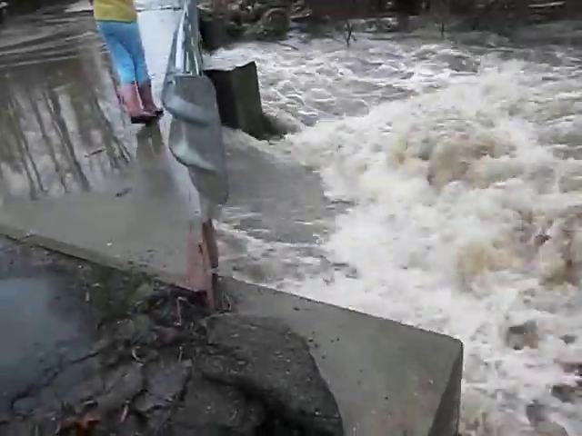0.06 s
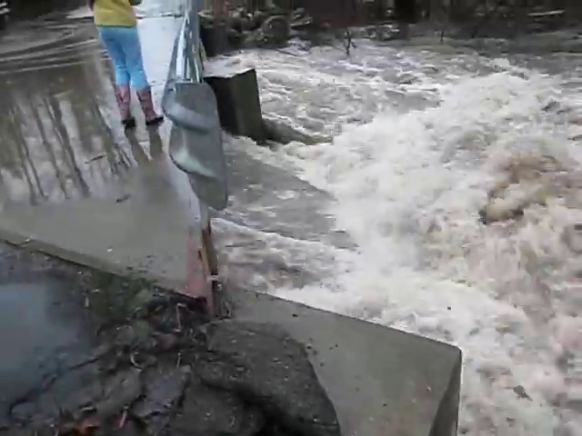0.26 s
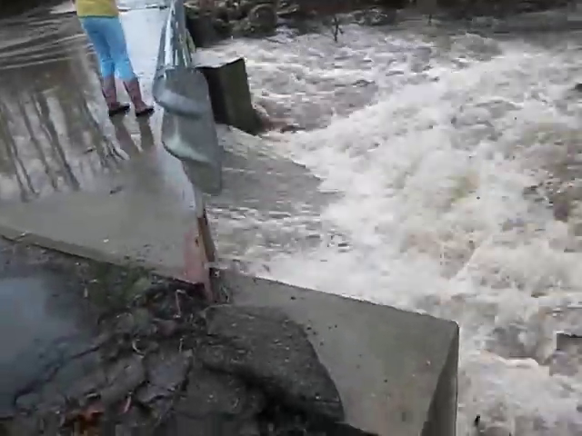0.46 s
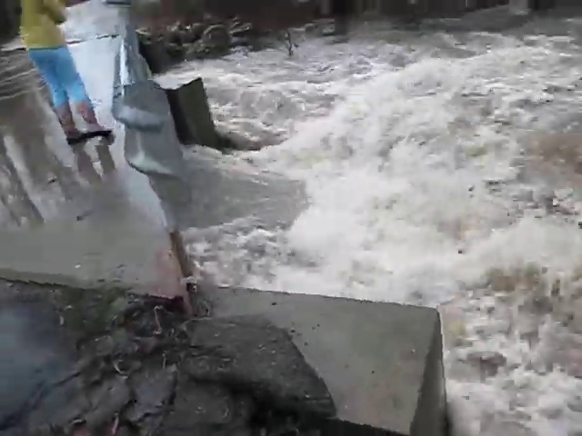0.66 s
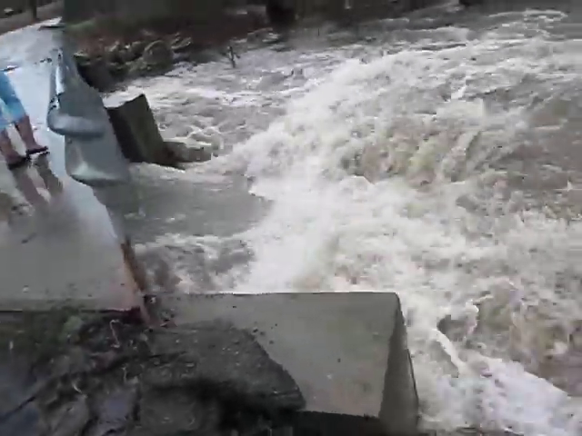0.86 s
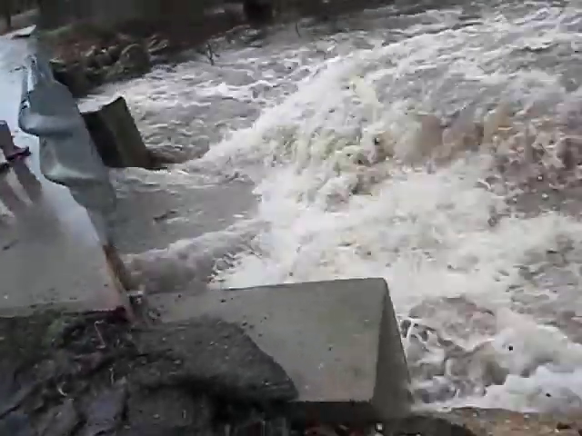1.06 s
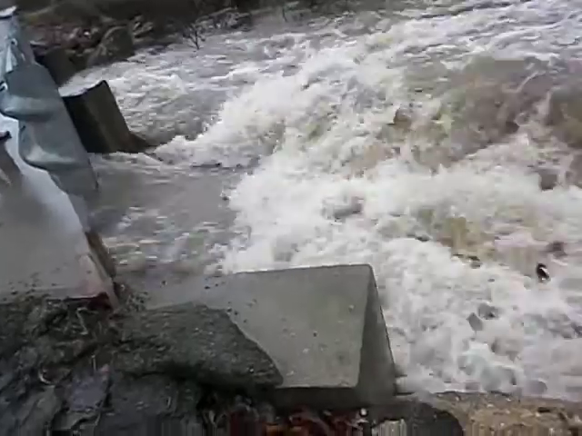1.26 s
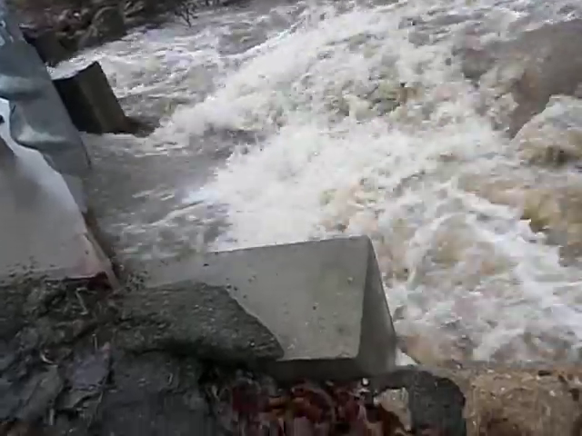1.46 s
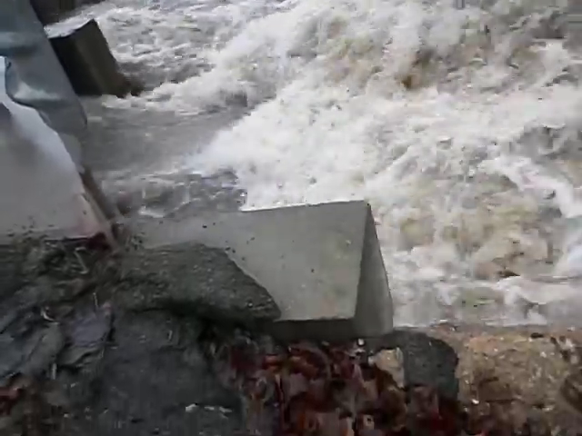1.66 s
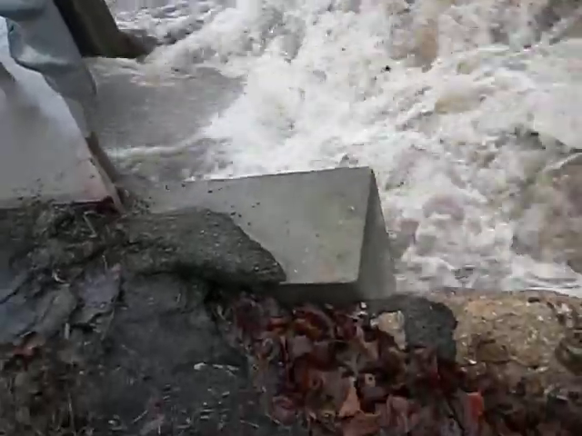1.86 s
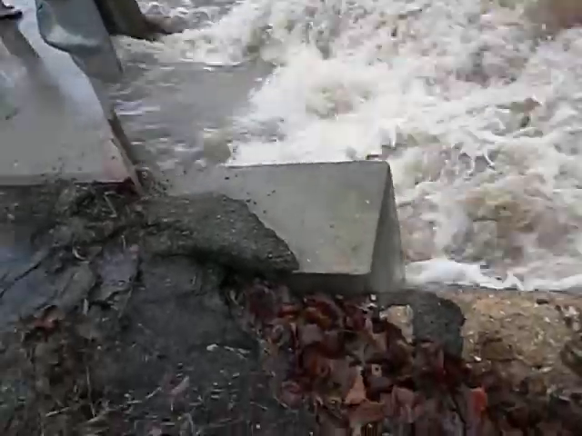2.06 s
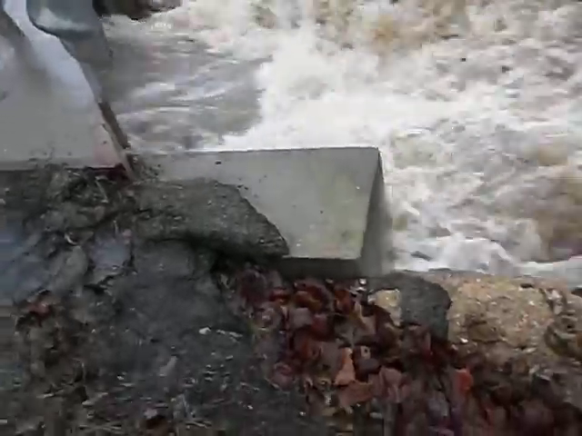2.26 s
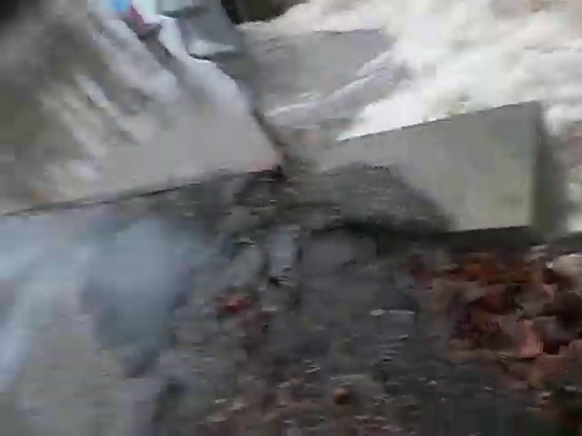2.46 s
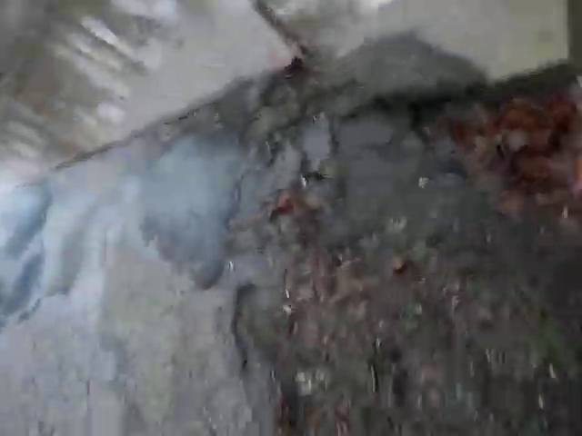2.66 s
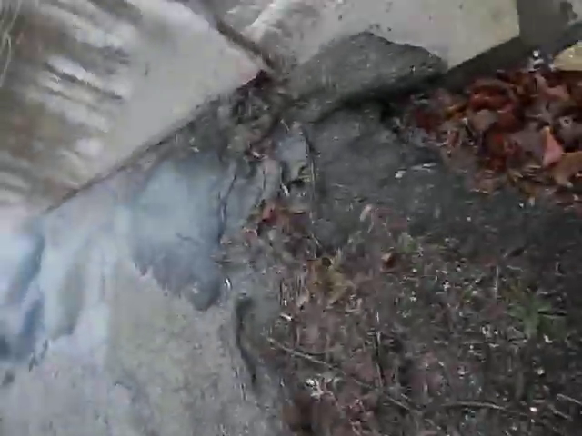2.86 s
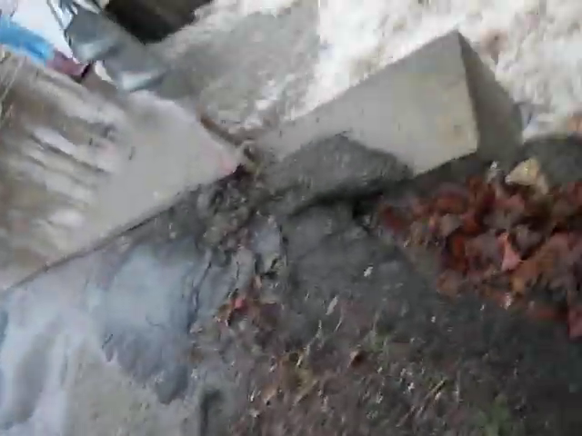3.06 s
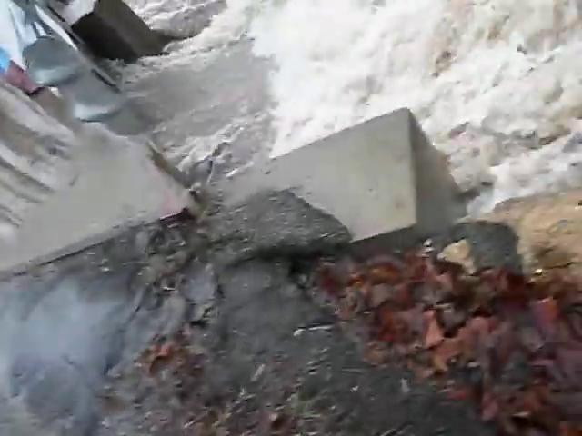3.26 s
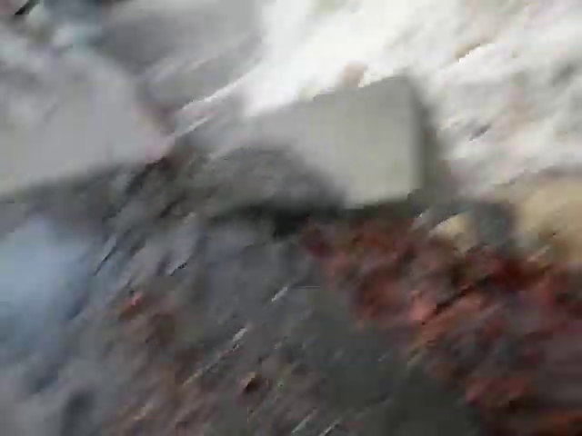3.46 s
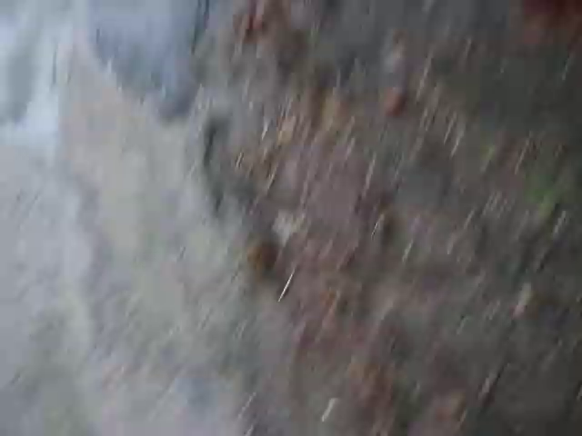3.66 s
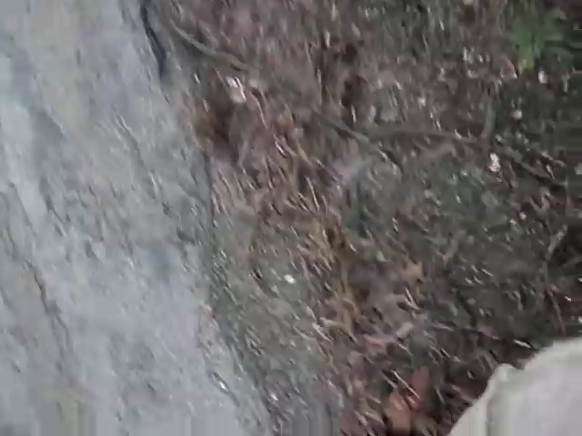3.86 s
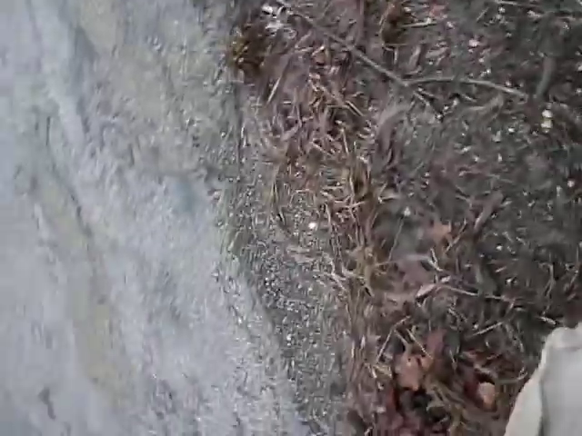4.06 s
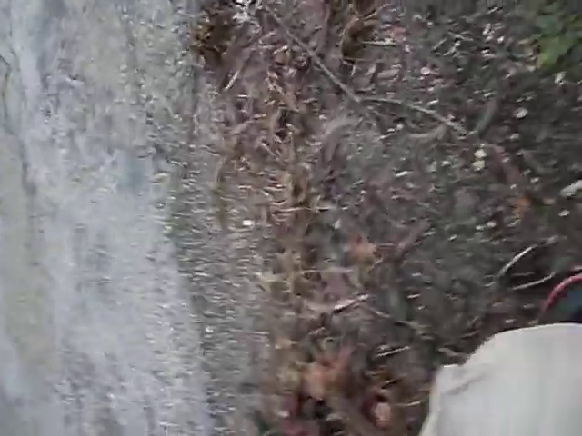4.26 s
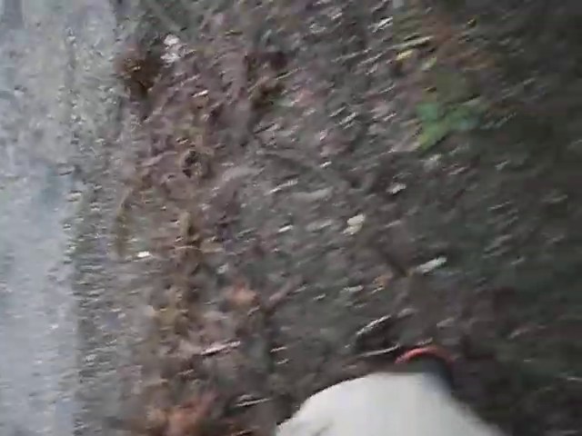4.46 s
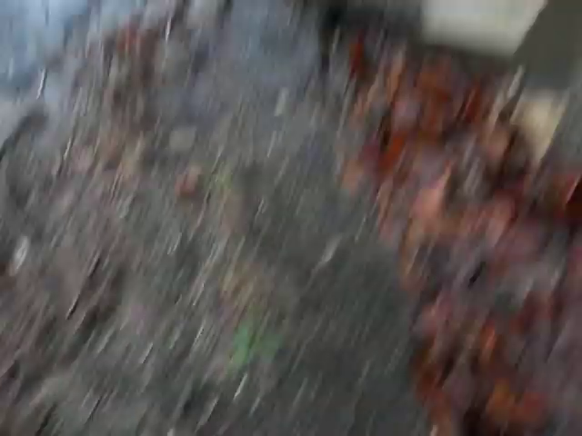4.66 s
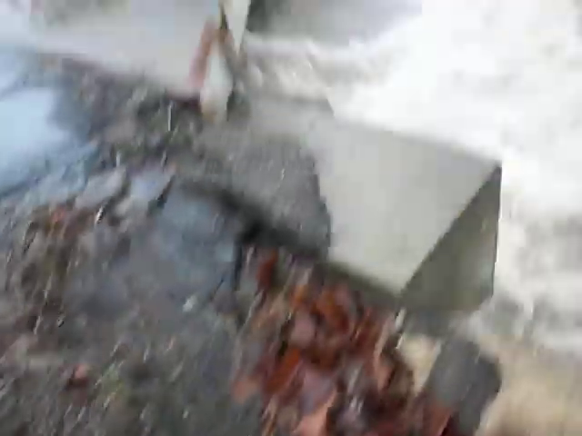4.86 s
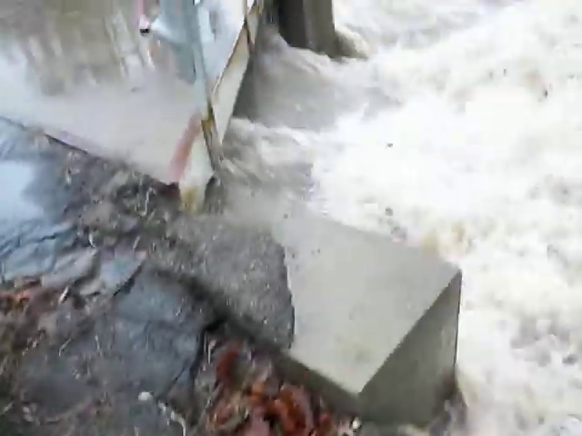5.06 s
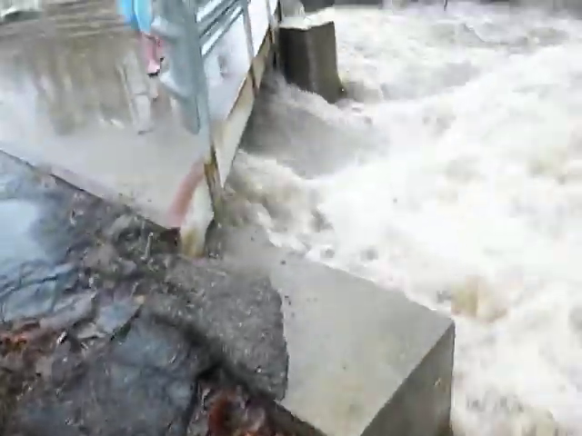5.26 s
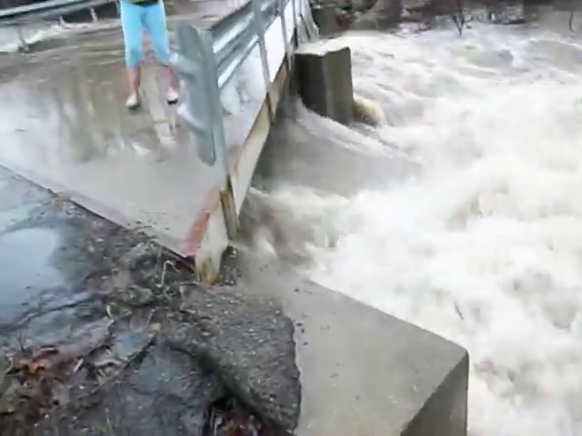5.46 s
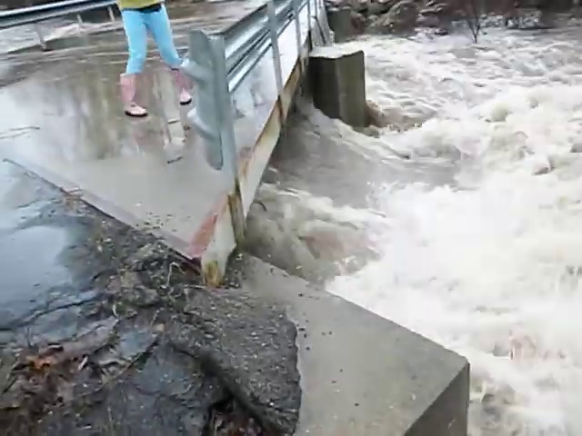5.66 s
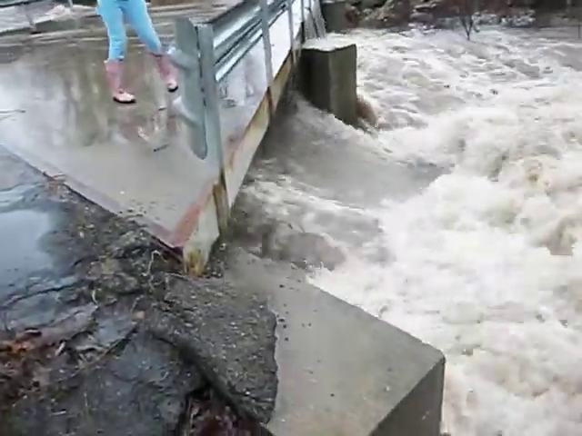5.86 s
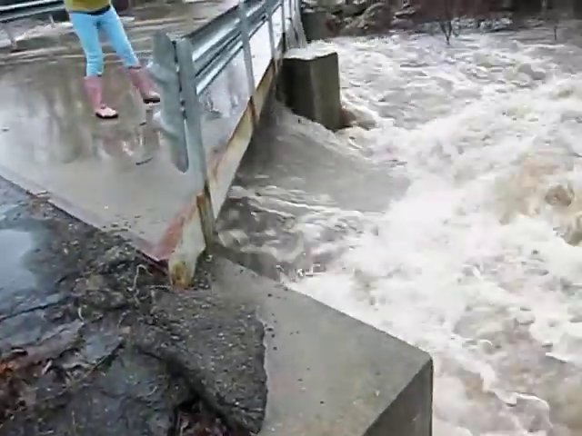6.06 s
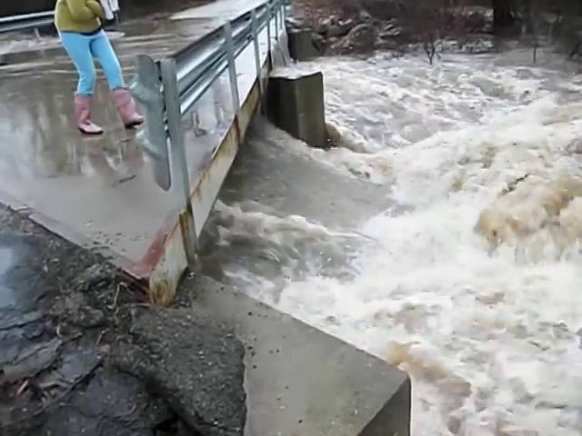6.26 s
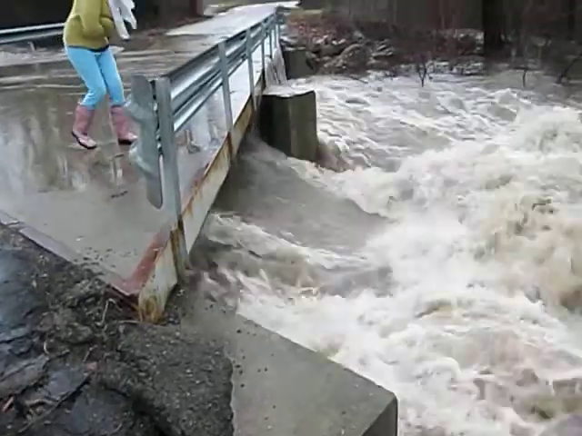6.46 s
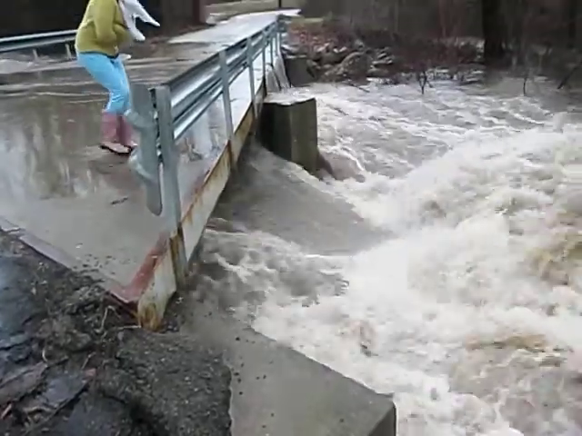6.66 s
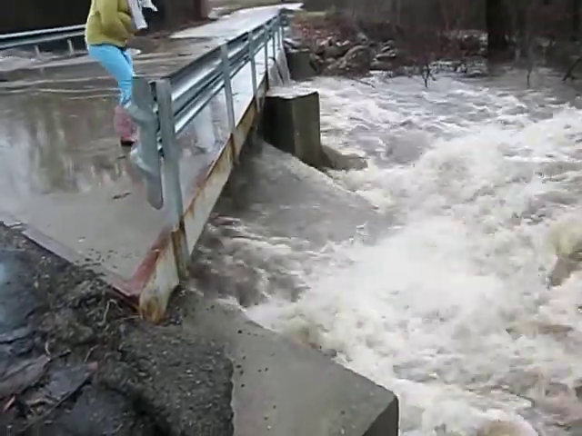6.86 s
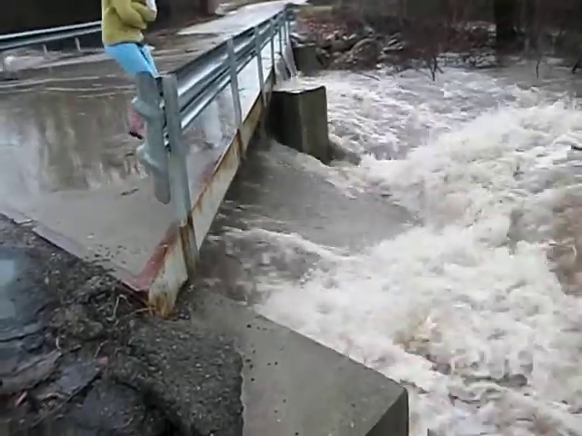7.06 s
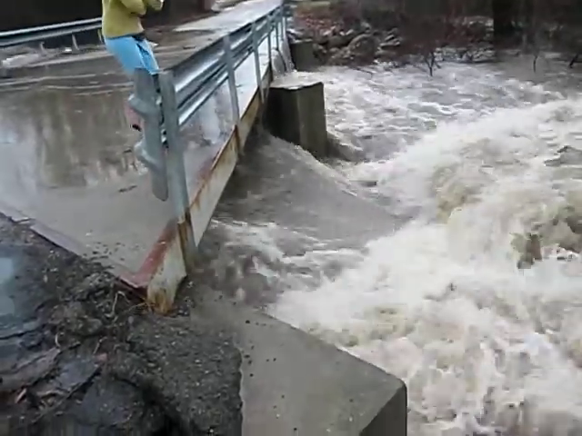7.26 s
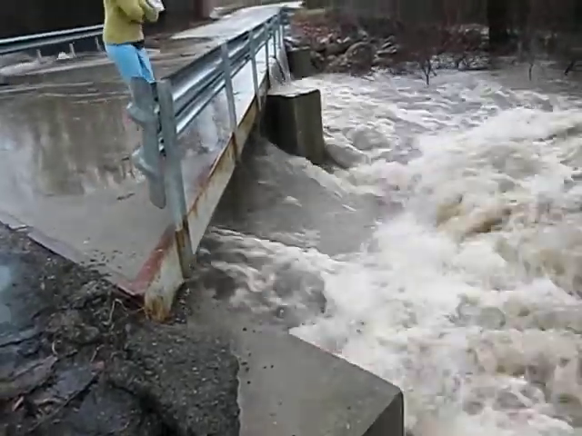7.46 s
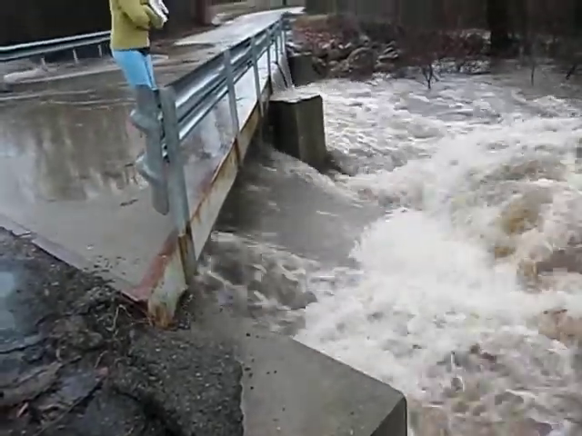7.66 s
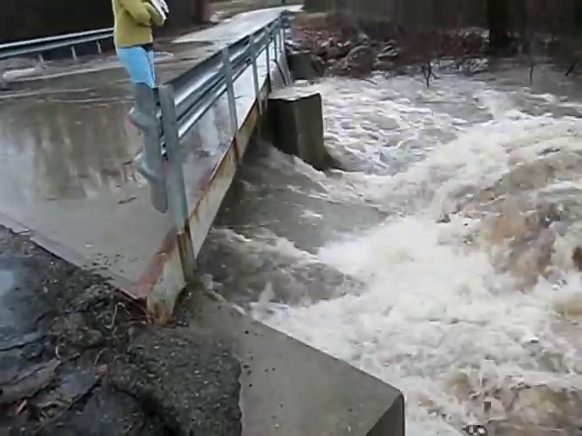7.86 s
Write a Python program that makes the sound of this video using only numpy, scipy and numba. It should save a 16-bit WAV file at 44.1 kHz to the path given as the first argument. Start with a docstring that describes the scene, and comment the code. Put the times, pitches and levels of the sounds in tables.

```python
"""The roar of a flooded creek, heard from the bank as it pours out under a low concrete bridge.
Countless bubbles in the white water merge into a wash that hardly changes, with nearer ones ringing in it.
Wind rumbles, thumps and snaps right on the microphone of a small hand-held camera; its shell ticks once.
At each hard buffet the camera's gain control ducks the water, which then swells back."""
import sys
import numpy as np
from scipy import signal
from scipy.fft import rfft, irfft, next_fast_len
from scipy.io import wavfile
from scipy.ndimage import uniform_filter1d
from numba import njit

SR = 44100
rng = np.random.default_rng(int(sys.argv[2]) if len(sys.argv) > 2 else 0)


def master_out(mix):
    """Clip the mix to full scale and print it as 16-bit PCM to the path in sys.argv[1]."""
    frames = np.transpose(np.atleast_2d(mix))
    ceiling = np.clip(frames, -1, 1)
    pcm = np.round(ceiling * 32767).astype(np.int16)
    wavfile.write(sys.argv[1], SR, pcm)


N = 349272
TIME = np.arange(N) / SR

# Colour of the large eddies at the microphone: frequency_hz, density_db
RUMBLE_SPECTRUM = [(8, 2), (25, 2), (60, -2.5), (130, -4.5), (250, -11), (500, -19.5), (1200, -52),
                   (4000, -87)]
# Colour of the small eddies at the microphone: frequency_hz, density_db
FLUTTER_SPECTRUM = [(60, -27.5), (200, -14), (350, 6.5), (800, -2.5), (1500, -13), (3000, -22),
                    (5000, -51.5), (9000, -77)]
# Gusts reaching the bank, with relative levels while they hold: start_s, hold_s, rumble_db, flutter_db
WIND_GUSTS = [(1.1, 0.043, -9, -30), (1.983, 0.33, -16, -20.5), (2.443, 0.28, -6.5, -19),
              (2.933, 0.11, 2.5, -12.5), (3.782, 0.38, -3, -10.5), (4.064, 0.46, 6, -1.5),
              (5.078, 0.16, -13, -26.5), (5.933, 0.67, -17, -22), (7.205, 0.062, -10.5, -17)]
# The hardest buffets on the microphone, weak above their corner: time_s, peak_db, length_s, corner_hz
MIC_BUFFETS = [(1.153, 2, 0.0071, 170), (1.68, -1, 0.004, 70), (1.895, -4.5, 0.0046, 70),
               (2.023, 2, 0.014, 287), (2.262, 10, 0.0066, 208), (2.437, 10.5, 0.01, 110),
               (2.487, 4, .005, 330), (2.512, 9.5, 0.007, 286), (2.678, 9.5, .007, 260),
               (2.724, 6.5, .007, 307), (2.76, 10.5, 0.0076, 300), (2.894, 7, 0.012, 275),
               (2.944, 15.5, 0.0056, 190), (2.981, 12, 0.014, 60), (3.052, 13, 0.029, 54.3),
               (3.77, 8.5, 0.033, 250), (3.856, 14.5, 0.0055, 297), (3.953, 15, 0.0067, 290),
               (4.023, 15.5, 0.0039, 330), (4.102, 21.5, 0.0063, 420), (4.121, 20, .025, 450),
               (4.154, 23, .01, 280), (4.193, 13, .003, 550), (4.288, 20.5, 0.0069, 170),
               (4.336, 17, 0.0042, 350), (4.468, 18, 0.022, 350), (4.496, 12.5, 0.0023, 560),
               (4.598, 12, 0.021, 168), (4.725, 2, 0.015, 220), (4.926, 1, 0.0052, 170),
               (5.265, 5, 0.0063, 319), (5.676, 5.5, 0.0043, 223), (5.877, 6, 0.0075, 238),
               (5.993, 2.5, 0.014, 74), (6.326, -2.5, 0.021, 85), (6.387, 1, 0.018, 205),
               (6.624, 2, .006, 160), (6.911, -3, 0.015, 165), (7.177, 2, 0.011, 280),
               (7.181, 5, 0.013, 91), (7.9, 2, .005, 220)]
# A sharp tick on the camera body: start_s, peak_db
SHELL_TICKS = [(2.461, 9)]
# Colour of the white water from the bank: frequency_hz, density_db
WATER_SPECTRUM = [(30, -13), (220, 0), (315, -8), (430, -0.5), (950, -2), (1300, -6.5), (1900, -7),
                  (2300, -9), (3300, -9), (4700, -10.5), (6100, -4), (7300, -10), (7900, -22), (8500, -30)]
# Slow rise and fall of the water's loudness at the microphone, partly as the camera turns:
# time_s, offset_db
WATER_LOUDNESS = [(0, 0), (1.1, 2), (1.85, 0.5), (2.15, -4), (2.55, 0), (3.4, -1), (4.25, 2), (4.75, 0),
                  (4.98, 5), (5.3, -4), (5.7, -1), (6.3, -0.5), (6.7, 0.5), (7.9, -1)]


def gain_of(db):
    """Decibels to amplitude."""
    return 10 ** (np.asarray(db) / 20)


def unit_rms(x):
    """Scales to an rms of one."""
    return x / np.sqrt(np.mean(x ** 2) + 1e-20)


def add_centred(mix, time_s, sound):
    """Mixes in a sound centred on time_s."""
    start = max(round(time_s * SR) - len(sound) // 2, 0)
    part = mix[start:start + len(sound)]
    part += sound[:len(part)]


def coloured(x, spectrum):
    """Filters a signal by a spectrum drawn on a log-frequency axis; the result has an rms of one."""
    size = next_fast_len(N)
    hz = np.fft.rfftfreq(size, 1 / SR)
    frequency_hz, density_db = np.transpose(spectrum)
    shape_db = np.interp(np.log(hz + 1), np.log(frequency_hz + 1), density_db)
    return unit_rms(irfft(rfft(x, size) * gain_of(shape_db), size)[:N])


def wander(rate_hz):
    """A smooth random drift with an rms of one, changing up to about rate_hz times a second."""
    size = next_fast_len(N)
    smoothing = np.exp(-(np.fft.rfftfreq(size, 1 / SR) / rate_hz) ** 2)
    return unit_rms(irfft(rfft(rng.standard_normal(size)) * smoothing, size)[:N])


def random_moments(count):
    """Moments spread through the scene, each with two draws from -1 to 1: (sample, draw, draw)."""
    place, first, second = rng.random((count, 3)).T
    samples = ((np.arange(count) + place) * N / count).astype(int)
    return zip(samples, 2 * first - 1, 2 * second - 1)


def shell_ticks(band_hz, decay_s, size=1024):
    """A dry click of a millisecond or two on the camera's shell, right by the microphone."""
    out = np.zeros(N)
    t = (np.arange(size) - size // 2) / SR
    envelope = (t >= 0) * np.exp(-abs(t) / decay_s)
    band = signal.butter(4, band_hz, "band", fs=SR, output="sos")
    for start_s, peak_db in SHELL_TICKS:
        click = signal.sosfilt(band, rng.standard_normal(size) * envelope)
        add_centred(out, start_s, gain_of(peak_db) * click / abs(click).max())
    return out


def gust_levels(breeze_rumble_db, breeze_flutter_db, rise_db_per_s, fall_db_per_s):
    """Rumble and flutter levels in dB: each gust rises out of the breeze, holds and dies away."""
    rumble_db, flutter_db = np.full(N, breeze_rumble_db), np.full(N, breeze_flutter_db)
    for start_s, hold_s, held_rumble_db, held_flutter_db in WIND_GUSTS:
        before_s, after_s = np.maximum(start_s - TIME, 0), np.maximum(TIME - start_s - hold_s, 0)
        below_db = rise_db_per_s * before_s + fall_db_per_s * after_s
        rumble_db = np.maximum(rumble_db, held_rumble_db - below_db)
        flutter_db = np.maximum(flutter_db, held_flutter_db - below_db)
    return rumble_db, flutter_db


def turbulence(rumble_db, flutter_db, lumpy_db, ragged_db):
    """Wind at the microphone port: large eddies rumble, small ones flutter in ragged clumps."""
    eddies = wander(rate_hz=35)
    lumps = unit_rms(gain_of(lumpy_db * np.tanh(eddies)))
    clumps = unit_rms(gain_of(ragged_db * np.tanh((eddies + wander(rate_hz=110)) / 2)))
    rumble = coloured(rng.standard_normal(N), RUMBLE_SPECTRUM) * lumps
    flutter = coloured(rng.standard_normal(N), FLUTTER_SPECTRUM) * clumps
    return gain_of(rumble_db) * rumble + gain_of(flutter_db) * flutter


def eddy(length_s, low_hz, knee_hz, top_hz, size=4096):
    """A whirl of pressure with a peak of one: flat from low to knee, then sloping, steeply above top."""
    t, hz = (np.arange(size) - size // 2) / SR, np.fft.rfftfreq(size, 1 / SR)
    low_cut = hz / np.hypot(hz, low_hz)
    roll_off = 1 / np.hypot(1, hz / knee_hz) / np.hypot(1, (hz / top_hz) ** 2)
    friction = np.exp(-(hz / 5000) ** 4)  # the smallest eddies die out
    burst = rng.standard_normal(size) / np.cosh(2 * t / length_s)
    whirl = irfft(rfft(burst) * low_cut * roll_off * friction)
    return whirl / abs(whirl).max()


def snap(peak_db):
    """The flow tears off the edge of the microphone port in a dry pop; harder ones are brighter."""
    brighter_octaves = 0.054 * peak_db
    return gain_of(peak_db) * eddy(0.0025, low_hz=288, knee_hz=820, top_hz=1080 * 2 ** brighter_octaves)


def crackle(level_db, spread_db, count=520):
    """Random snaps ride on the flutter and stand clear of the water only in strong gusts."""
    out = np.zeros(N)
    for at, strength, _ in random_moments(count):
        add_centred(out, at / SR, snap(level_db[at] + spread_db * strength))
    return out


def bumps(level_db, spread_db, length_s, low_hz, corner_hz, count=40):
    """Lesser eddies bump the microphone at random, harder in the gusts."""
    out = np.zeros(N)
    for at, strength, speed in random_moments(count):
        knee_hz = corner_hz * 2 ** (speed / 2)
        bump = eddy(length_s, low_hz, knee_hz, top_hz=2 * knee_hz)
        add_centred(out, at / SR, gain_of(level_db[at] + spread_db * strength) * bump)
    return out


def buffets(snap_db, snap_at_hz, snap_db_per_octave):
    """Each large eddy thumps the microphone; faster, smaller ones reach higher and snap louder."""
    out = np.zeros(N)
    for time_s, peak_db, length_s, corner_hz in MIC_BUFFETS:
        thump = eddy(length_s, low_hz=4.8, knee_hz=corner_hz, top_hz=1.76 * corner_hz)
        add_centred(out, time_s, gain_of(peak_db) * thump)
        speed_db = snap_db_per_octave * np.log2(corner_hz / snap_at_hz)
        add_centred(out, time_s, snap(peak_db + snap_db + speed_db))
    return out


def near_bubbles(per_s, spread_db, cycles, pitches=16):
    """Bubbles nearer the bank ring for a few cycles each, rising in pitch as they reach the surface."""
    out = np.zeros(N)
    for pitch_hz in np.geomspace(350, 7000, pitches):
        age = np.arange(1500) / SR * pitch_hz / cycles  # in ring lengths
        rise = 1 + 0.066 * np.minimum(age, 2)
        ring = np.exp(-2 * age) * np.sin(2 * np.pi * cycles * age * rise)
        born = rng.random(N) < per_s / pitches / SR
        births = np.zeros(N)
        births[born] = gain_of(spread_db * np.minimum(rng.standard_exponential(N)[born], 4))
        out += signal.oaconvolve(births, ring / np.linalg.norm(ring))[:N] * np.sqrt(pitch_hz)
    return unit_rms(out)


def foam(patchy_db, flicker_db, spray_db, size=512, hop=128):
    """Countless bubbles merge into a roar; collapsing crests lift patches of it, and spray its treble."""
    hz, frames = np.fft.rfftfreq(size, 1 / SR), N // hop + 6
    real, imag, patches = rng.standard_normal((3, len(hz), frames))
    patches = uniform_filter1d(patches, size=16, axis=1)  # smooth in time
    patches = unit_rms(uniform_filter1d(patches, size=8, axis=0))  # and in frequency
    spray = unit_rms(uniform_filter1d(rng.standard_normal(frames), size=14))
    treble = np.minimum(hz / 6000, 1)[:, None]
    spectra = (real + 1j * imag) * gain_of(patchy_db * patches + spray_db * treble * spray)
    roar = signal.istft(spectra, nperseg=size, noverlap=size - hop)[1][:N]
    return unit_rms(roar * gain_of(flicker_db * wander(rate_hz=30)))


def white_water(level_db):
    """Steady rapids: foam and near bubbles share one colour and one loudness curve at the microphone."""
    roar = foam(patchy_db=0.73, flicker_db=1.35, spray_db=0.76)
    bubbles = gain_of(-11.0) * near_bubbles(per_s=2500, spread_db=3.5, cycles=4.8)
    offset_db = np.interp(TIME, *np.transpose(WATER_LOUDNESS))
    return gain_of(level_db + offset_db) * coloured(roar + bubbles, WATER_SPECTRUM)


def scene():
    """One microphone on the bank: the creek in front, the wind right on the port."""
    rumble_db, flutter_db = gust_levels(breeze_rumble_db=-22.5, breeze_flutter_db=-28.0,
                                        rise_db_per_s=187, fall_db_per_s=86)
    wind = turbulence(rumble_db - 1.5, flutter_db - 6.5, lumpy_db=6.0, ragged_db=9.0)
    wind += buffets(snap_db=-5, snap_at_hz=298, snap_db_per_octave=5.5)
    wind += crackle(flutter_db + 8, spread_db=6.5)
    wind += bumps(0.59 * rumble_db + 6.5, spread_db=3, length_s=0.012, low_hz=39.4, corner_hz=169)
    creek = white_water(level_db=-15)
    tick = shell_ticks(band_hz=(2000, 4800), decay_s=0.0008)
    return (creek + wind + tick)[None]


@njit
def gain_control(x, limit, attack_db_per_s, recovery_db_per_s):
    """The camera's gain slides down fast while the output is over the limit, and creeps back otherwise."""
    out = np.empty_like(x)
    duck_db = 0.
    for i in range(len(x)):
        out[i] = x[i] * 10 ** (-duck_db / 20)
        if abs(out[i]) > limit:
            duck_db += attack_db_per_s / SR
        else:
            duck_db = max(duck_db - recovery_db_per_s / SR, 0.)
    return out


def record(dry):
    """Inside the camera: gain control, clipping of what slips past it, and a narrow band."""
    ducked = gain_control(dry[0], limit=gain_of(-7.0), attack_db_per_s=1303.5, recovery_db_per_s=45.0)
    clipped = np.clip(ducked, -0.93, 0.93)
    low_pass = signal.firwin(301, cutoff=8850, window=("kaiser", 9), fs=SR)
    return signal.oaconvolve(clipped, low_pass, "same")[None]


dry = scene()
out = record(dry)
master_out(out)
```